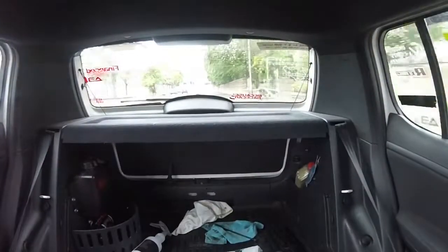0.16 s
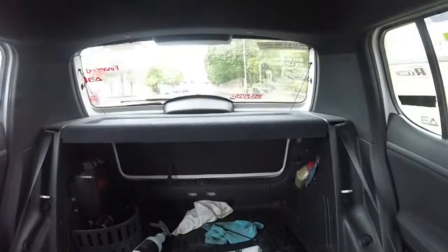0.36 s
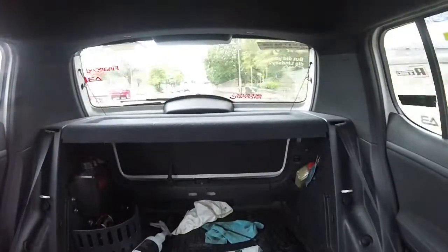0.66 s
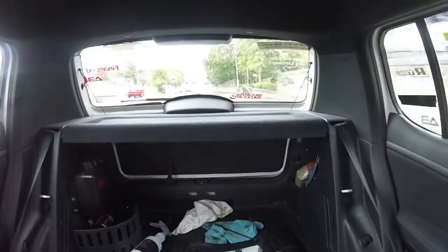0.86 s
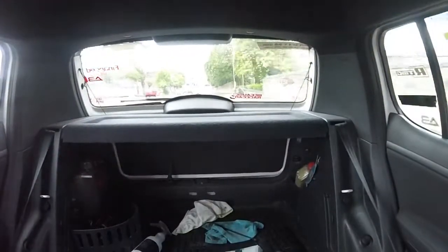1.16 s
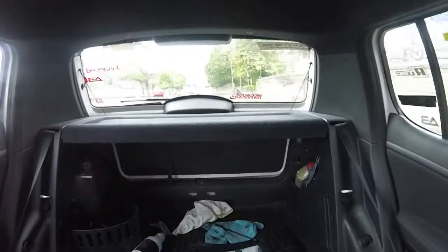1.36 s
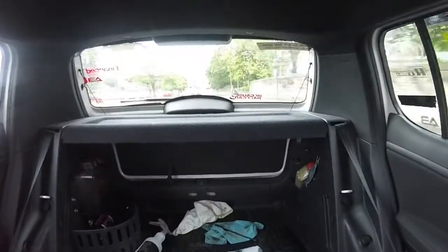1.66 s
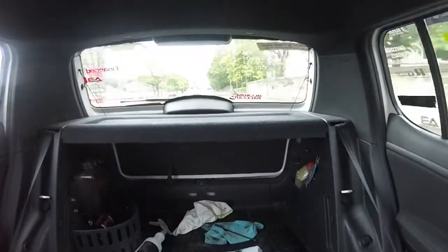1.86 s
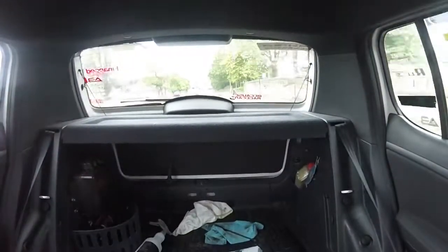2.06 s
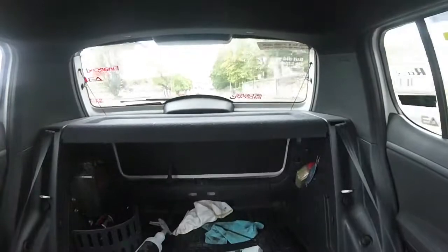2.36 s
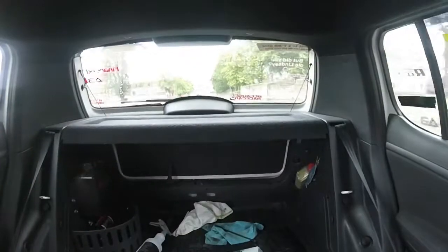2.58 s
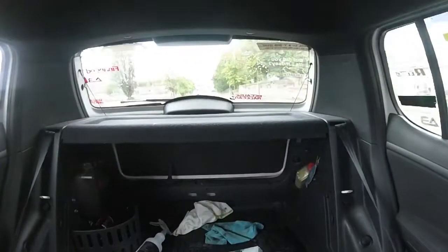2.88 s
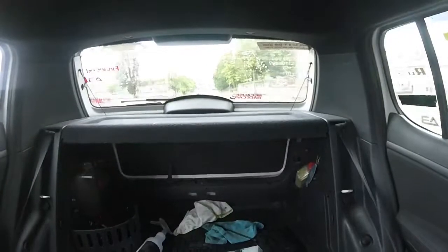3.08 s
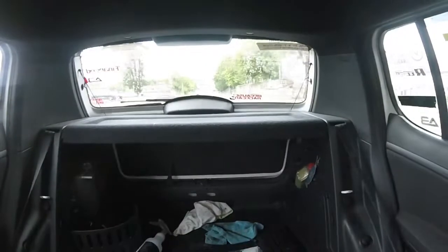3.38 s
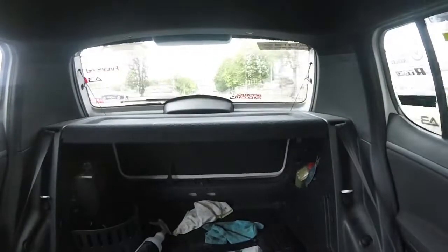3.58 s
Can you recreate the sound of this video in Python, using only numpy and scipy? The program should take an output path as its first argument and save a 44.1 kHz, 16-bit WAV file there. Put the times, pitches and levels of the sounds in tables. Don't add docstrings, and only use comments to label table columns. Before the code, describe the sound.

A car engine booms and climbs inside a bare moving cabin, then the throttle lifts: air rushes and whistles downward, a valve flutters, thumps begin, and a low exhaust drone settles over road rumble.

```python
import sys
import numpy as np
from scipy import signal
from scipy.io import wavfile
from scipy.ndimage import uniform_filter1d

SR = 44100
rng = np.random.default_rng(int(sys.argv[2]) if len(sys.argv) > 2 else 0)


def voltage_ratio(level):
    return 10 ** (np.asarray(level, float) / 20)


def unload_audio(sound):
    columns = np.transpose(np.atleast_2d(sound))
    steps = np.round(np.clip(columns, -1, 1) * 32767)
    wavfile.write(sys.argv[1], SR, steps.astype(np.int16))


N = 164493
T = np.arange(N) / SR

# t/s, firing rate f/Hz, load level/dB
ENGINE = [(0, 64.1, -0.5), (.18, 66.32, 0.5), (.42, 68.1, 3), (.68, 69.69, 3), (.92, 71.65, 4),
          (1.28, 75.22, 4), (1.35, 75.1, 1.5), (1.39, 74.2, -0.5), (1.5, 73.23, -2.5), (1.55, 68.4, -22),
          (2.4, 52.7, -26), (2.9, 52.1, -13.5), (3.1, 49.45, -12), (3.73, 49.28, -16)]
# t/s, flow level/dB
FLOW = [(0.04, -46), (0.59, -44), (1.3, -43.5), (1.4, -48), (1.49, -46), (1.7, -47.5), (2.04, -53.5),
        (2.16, -57), (2.28, -54.5), (2.29, -61), (2.46, -56.5), (3.68, -55)]


def evened(x):
    return x / np.sqrt(np.mean(x ** 2) + 1e-20)


def curve(table, col=1):
    rows = np.array(table, float)
    return np.interp(T, rows[:, 0], rows[:, col])


def add(mix, s, sound):
    part = mix[round(s * SR):][:len(sound)]
    part += sound[:len(part)]


def resonate(x, hz, width):
    pole = np.exp((2j * np.pi * hz - np.pi * width) / SR)
    return 2 * signal.lfilter([1 - abs(pole)], [1, -pole], x).real


def drift(rate):
    t = T[::64]
    coarse = sum(np.sin(2 * np.pi * (f * t + rng.random())) / np.sqrt(f)
                 for f in np.geomspace(rate / 10, rate, 16))
    return evened(np.interp(T, t, coarse))


def noise(tone, patchy_db, size=1024):
    hop = size // 4
    frames, hz = N // hop + 6, np.fft.rfftfreq(size, 1 / SR)
    a, b, patches = rng.standard_normal((frames, len(hz), 3)).T
    patches = uniform_filter1d(patches, size=8, axis=0)
    patches = evened(uniform_filter1d(patches, size=8, axis=1))
    f, db = np.transpose(tone)
    colour_db = np.interp(np.log(hz + 1), np.log(f + 1), db, left=-60, right=-90)[:, None]
    z = (a + 1j * b) * voltage_ratio(colour_db + patchy_db * patches)
    return evened(signal.istft(z, nperseg=size, noverlap=size - hop)[1][:N])


def engine():
    # f/Hz, width/Hz, level/dB
    cabin = [(76.9, 13, -3), (133, 24.5, -2), (201.25, 9.1, 6.5), (254, 52, -18), (280, 28, -4.5),
             (314.5, 33, -4.5), (368.4, 14, -9.5), (437, 10, -6.5), (491.9, 12, -5), (525, 22, -10),
             (591, 36, -12.5), (716, 27, -9), (814, 44, -19.5), (128.5, 2.3, 4)]
    # order as a multiple of the firing rate (half steps allowed), level/dB
    order_trim = [(2, 0), (4, -1), (5, 2), (5.5, 9), (7.5, 10), (9, -5), (10, -7), (10.5, 6), (11, 1),
                  (12, -6)]
    level_db, tilt_db_per_octave, half_order_db, waver_db = -19.5, -2.5, -33, -2
    low_order_load = 2.34
    turns, load_db = np.cumsum(curve(ENGINE)) / SR, curve(ENGINE, col=2)
    trim_db = {round(2 * order): db for order, db in order_trim}
    drive = np.zeros(N)
    for k in range(2, 28):
        order_db = tilt_db_per_octave * np.log2(k / 2) + half_order_db * (k % 2) + trim_db.get(k, 0)
        order_db = order_db + waver_db * drift(8.3)
        order_db = order_db + load_db * (low_order_load if k < 7 else 1)
        drive += voltage_ratio(order_db) * np.sin(2 * np.pi * (k / 2 * turns + rng.random()))
    heard = np.zeros(N)
    for k, (hz, width, db) in enumerate(cabin):
        heard += (-1) ** k * voltage_ratio(db) * resonate(drive, hz, width)
    return voltage_ratio(level_db) * (heard - .8 * resonate(heard, 136, 9))


def drone():
    level_db, from_s, rise_s, order = -30.5, 2.784, 0.37, 5
    swell = np.clip((T - from_s) / rise_s, 0, 1)
    turns = np.cumsum(curve(ENGINE)) / SR
    return np.sqrt(2) * swell * voltage_ratio(level_db + drift(5.3)) * np.sin(2 * np.pi * order * turns)


def whistle():
    # start t/s, length/s, first f/Hz, last f/Hz, level/dB
    notes = [
        (1.37, .15, 550, 572, -24),
        (1.41, .12, 650, 615, -32),
        (1.475, .165, 558, 512, -19),
        (1.6, .165, 500, 468, -20.5),
        (1.7, .13, 442, 418, -21),
        (1.81, .125, 388, 368, -25),
        (1.97, .28, 331, 328, -30),
        (2.24, .2, 287, 283, -36),
        (1.42, .11, 1225, 1165, -44),
    ]
    overtones_db = [-26, -24, -12, -24, -19, -32, -32, -32]
    third_db, breathy_rad = -17, .16
    out, flicker = np.zeros(N), voltage_ratio(.7 * drift(40))
    for (start, length, first_hz, last_hz, db), over_db in zip(notes, overtones_db + [-30]):
        u = np.arange(0, 1, 1 / (length * SR))
        swell = np.sin(np.pi * u) ** 1.2
        breath = rng.standard_normal(N // 8)
        for hz, width in [(28, 60), (20, 200), (20, 400)]:
            breath = resonate(breath, hz, width)
        wobble = breathy_rad * evened(breath)[-len(u):]
        a = 2 * np.pi * np.cumsum(first_hz + (last_hz - first_hz) * u) / SR + wobble
        overtones = np.sin(2 * a) + voltage_ratio(third_db) * np.sin(3 * a)
        tone = np.sin(a) + swell * voltage_ratio(over_db) * overtones
        add(out, start, np.sqrt(2) * voltage_ratio(db) * swell * tone)
    return out * flicker


def rush():
    # t/s, centre f/Hz, level/dB
    slide = [(1.36, 600.4, -59), (1.45, 610, -33.5), (1.6, 579.4, -30.5), (1.75, 518, -36),
             (1.9, 445.5, -36), (2.0, 422, -53)]
    width_hz, overtone_db = 240, -11.5
    turn, r = np.exp(2j * np.pi * np.cumsum(curve(slide)) / SR), np.exp(-np.pi * width_hz / SR)
    smooth = np.convolve([1, -r], [1, -r])
    a, b, c, d = signal.lfilter([1], smooth, rng.standard_normal((N, 4)), axis=0).T
    low_band = evened(((a + 1j * b) * turn).real)
    high_band = evened(((c + 1j * d) * turn ** 2).real)
    gate = (T > slide[0][0]) & (T < slide[-1][0])
    return gate * voltage_ratio(curve(slide, col=2)) * (low_band + voltage_ratio(overtone_db) * high_band)


def flutter():
    # t/s, peak level/dB
    pops = [(1.999, -25), (2.066, -28), (2.136, -16), (2.204, -17), (2.277, -21), (2.34, -26), (2.405, -30),
            (2.475, -25), (2.57, -31), (2.607, -31), (2.666, -32), (2.709, -27), (2.81, -29), (2.882, -28),
            (2.95, -27), (3.01, -31), (3.08, -32), (3.209, -26), (3.272, -30), (3.434, -29)]
    # f/Hz, time to fall by 60 dB/s, level/dB
    ringing = [(495, .045, -8)]
    first_hz, last_hz, pop_s = 640, 230, .012
    out, t = np.zeros(N), np.arange(4000) / SR
    u = np.minimum(t / pop_s, 1)
    for (s, db), r in zip(pops, rng.random(len(pops))):
        hz = (first_hz + (last_hz - first_hz) * u) * (.94 + .12 * r)
        pop = np.sin(np.pi * u ** .6) ** 2 * np.sin(2 * np.pi * np.cumsum(hz) / SR)
        ring = sum(voltage_ratio(ring_db - 60 * t / t60) * np.sin(2 * np.pi * f * t) for f, t60, ring_db in ringing)
        add(out, s - .004, voltage_ratio(db + .5) * (pop + np.minimum(t / .006, 1) * ring))
    return out


def thumps():
    # t/s, peak level/dB, f/Hz
    jolts = [(1.491, -8, 96.6), (1.585, -9.5, 93), (1.69, -8, 91.7), (1.817, -19, 100.6),
             (1.876, -3.5, 133), (1.974, -11, 94.3), (2.013, -5.5, 63.3), (2.141, -7, 92),
             (2.226, -5.5, 48), (2.282, -3.5, 62.4), (2.408, -7.5, 92), (2.448, -11, 87.7), (2.544, -3, 97),
             (2.6, -7, 131.3), (2.639, -7.5, 113.6), (2.682, -8, 63.1), (2.742, -14.5, 74.9),
             (2.81, -6.5, 59.9), (2.886, -4, 130.3), (2.955, -3.5, 146), (3.012, -2, 124), (3.08, -4.5, 89),
             (3.144, -8, 121), (3.173, -8.5, 105), (3.21, -6.5, 95), (3.359, -11, 73.5),
             (3.437, -10.5, 112), (3.49, -12.5, 76), (3.578, -7.5, 82), (3.6, -10, 140)]
    rise_cycles, fall_cycles, level_db = 0.48, 0.84, -0.7
    out, t = np.zeros(N), np.arange(-2000, 4000) / SR
    for s, db, hz in jolts:
        swing = np.exp(-(hz * t / np.where(t < 0, rise_cycles, fall_cycles)) ** 2)
        add(out, s + t[0], voltage_ratio(db + level_db) * swing * np.cos(2 * np.pi * hz * t - 2.3))

    tick_s, tick_db, tick_t60_s = 2.2314, -25, .003
    tick = voltage_ratio(tick_db - 60 * t[t >= 0] / tick_t60_s)
    add(out, tick_s, resonate(tick, 0, 12000) / 2)

    puff_s, puff_length_s, puff_db = 1.605, .04, -55
    size = round(puff_length_s * SR)
    puff = resonate(resonate(rng.standard_normal(size), 5400, 2500), 5400, 2500)
    add(out, puff_s, voltage_ratio(puff_db + 4) * np.hanning(size) * evened(puff))
    return out


def road():
    # t/s, roughness level/dB
    roughness = [(0.0, -33.5), (0.9, -13.5), (0.93, -41.5), (1.07, -11), (1.36, -27), (1.68, -15.5),
                 (1.94, -18), (2.0, -16), (2.06, -19.5), (2.24, -15.5), (2.63, -25), (2.68, -7),
                 (2.75, -16), (2.83, -12.5), (2.91, -20), (2.99, -17), (3.7, -24), (3.73, -29.5)]
    # f/Hz, level/dB
    rumble_tone = [(8.8, -41.5), (15, -7), (38, -0.5), (70, -4.5), (107, -5), (171, -8), (201, -10.5),
                   (217, -14.5), (300, -26), (390, -41.5), (660, -120)]
    body_hz, body_width_hz, body_db = 45.25, 12, -8
    level_db, per_rough, per_flow = -17.5, 0.3, -0.052
    rough_db, flow_db = curve(roughness), curve(FLOW)
    boom_hz = body_hz + body_width_hz / 2 * drift(15)
    boom = np.sqrt(2) * np.sin(2 * np.pi * np.cumsum(boom_hz) / SR)
    rumble = noise(rumble_tone, patchy_db=.5, size=4096)
    rumble_db = level_db + per_rough * (rough_db - rough_db.mean())
    rumble_db = rumble_db + per_flow * (flow_db - flow_db.mean())
    return voltage_ratio(rumble_db) * rumble + voltage_ratio(body_db + rough_db) * boom


def air():
    # f/Hz, level/dB
    roar_tone = [(120, -33.5), (200, -10), (341, -14.5), (377, -10), (457, -17), (501, -14.5), (574, -20.5),
                 (1050, -24.5), (3000, -51), (3900, -79.5), (6600, -120)]
    # f/Hz, level/dB
    hiss_tone = [(530, -33), (900, -7), (1440, -11), (2090, -9), (2740, -21.5), (3080, -14.5), (4630, -24),
                 (6590, -19), (7830, -33.5), (10200, -51.5), (17200, -120)]
    # f/Hz, width/Hz, level/dB
    trim_panels = [(1534, 26, -3.5), (2080, 24, 1), (2350, 120, 3), (2590, 73, 0), (2983, 46, -0.5),
                   (3308, 57, -4.5), (3890, 46, -7.5), (3710, 46, -14), (5370, 42, -10.5),
                   (6580, 67, -20.5)]
    # f/Hz, level/dB
    wind_tone = [(2650, -38), (4500, -7.5), (5700, -12.5), (6450, -3.5), (7000, -12), (8500, -11.5),
                 (10200, -22), (13200, -21.5), (14500, -49)]
    roar_db, roar_follow, wind_db, wind_follow, panel_db = -35.5, 0.3, -68, 0.37, -4.5
    flow_db = curve(FLOW)
    over_db = flow_db - flow_db.min()
    roar = noise(roar_tone, patchy_db=1.2) * voltage_ratio(.6 * drift(25))
    white, panels = rng.standard_normal(N), np.zeros(N)
    for hz, width, db in trim_panels:
        panels += voltage_ratio(db) * evened(resonate(resonate(white, hz, width), hz, 3 * width))
    hiss = noise(hiss_tone, patchy_db=1.0) + voltage_ratio(panel_db) * evened(panels)
    hiss = hiss * voltage_ratio(0.79 * drift(17))
    wind = noise(wind_tone, patchy_db=2)
    roar = voltage_ratio(roar_db + roar_follow * over_db) * roar
    wind = voltage_ratio(wind_db + wind_follow * over_db) * wind
    return roar + voltage_ratio(flow_db) * hiss + wind


def scene():
    voices = engine() + drone() + whistle() + rush() + flutter()
    return (voices + thumps() + road() + air())[None]


def roll_off(x):
    return signal.sosfilt(signal.butter(12, 14000, fs=SR, output="sos"), x)


def record(dry):
    ceiling = 1.6
    return roll_off(ceiling * np.tanh(dry / ceiling))


dry = scene()
out = record(dry)
unload_audio(out)
```